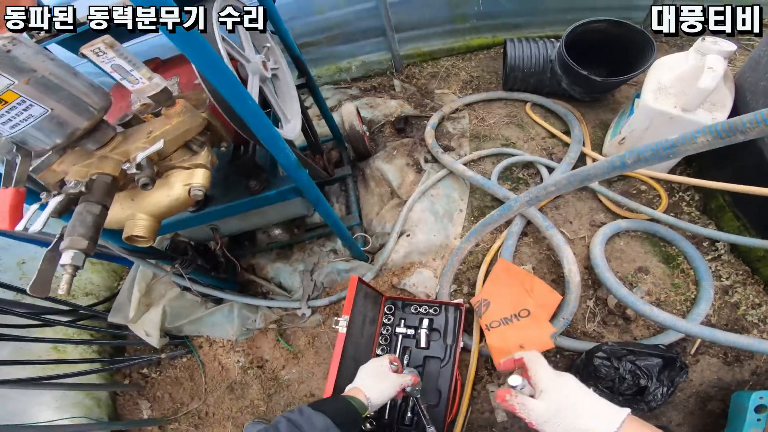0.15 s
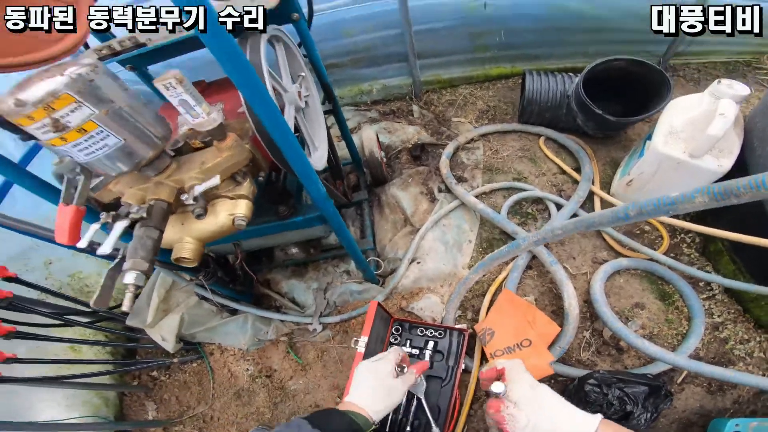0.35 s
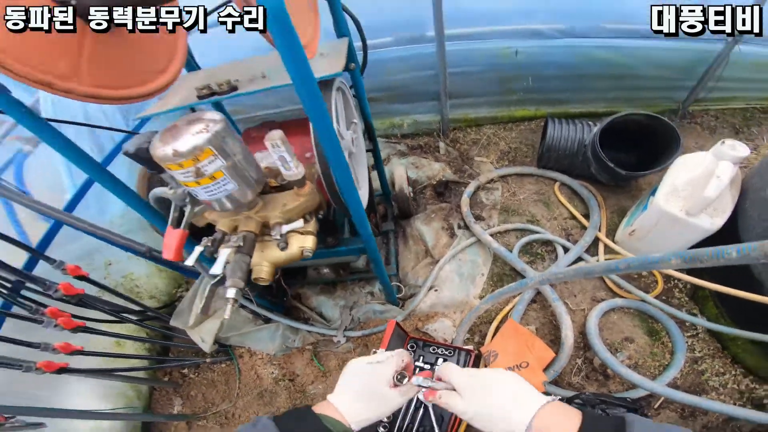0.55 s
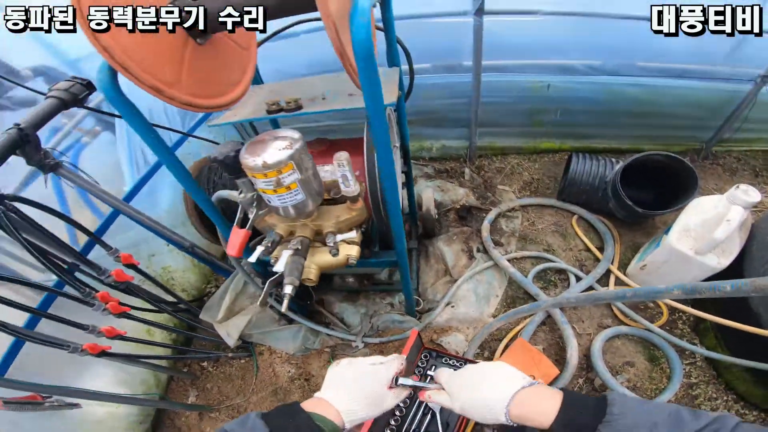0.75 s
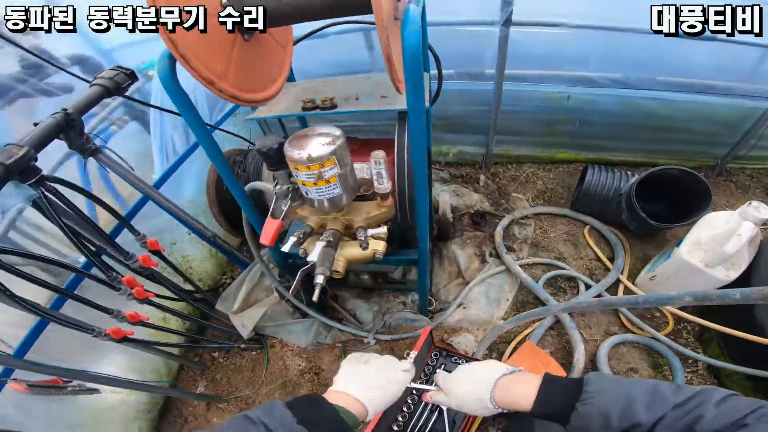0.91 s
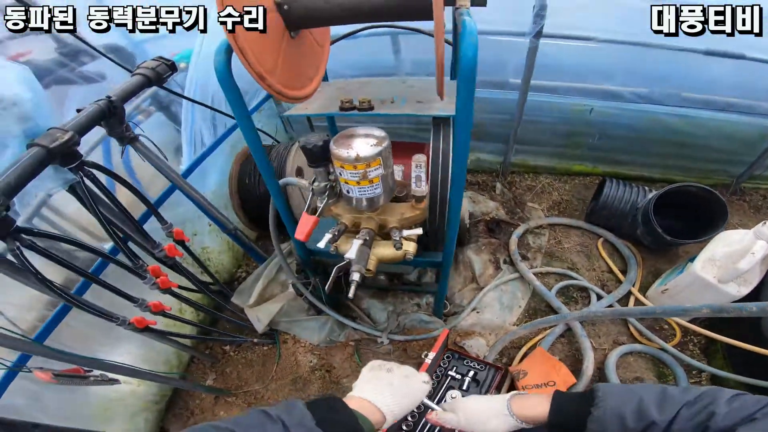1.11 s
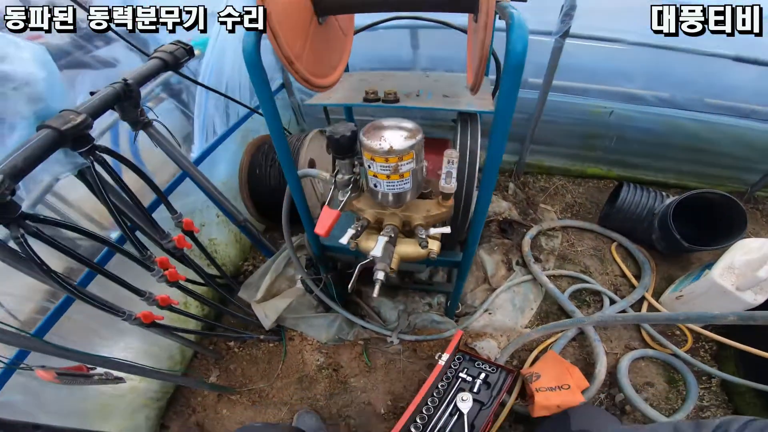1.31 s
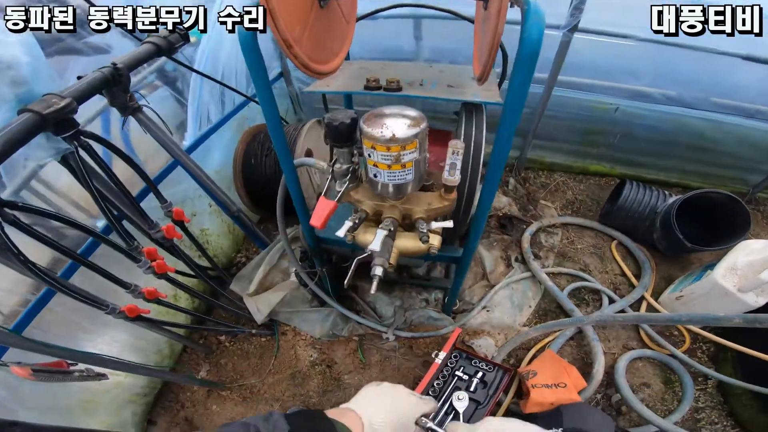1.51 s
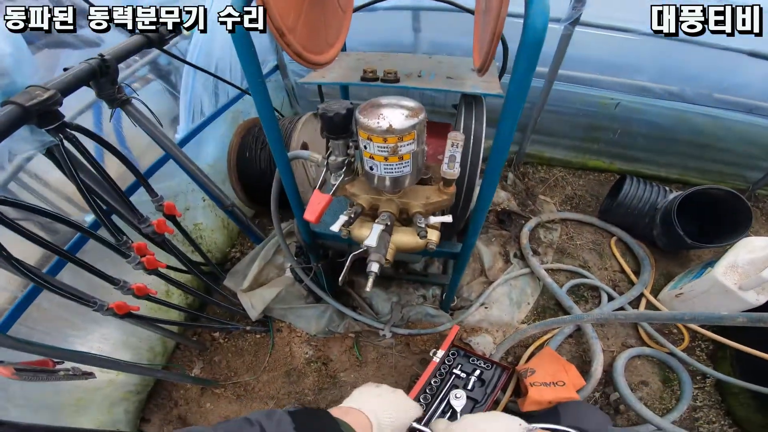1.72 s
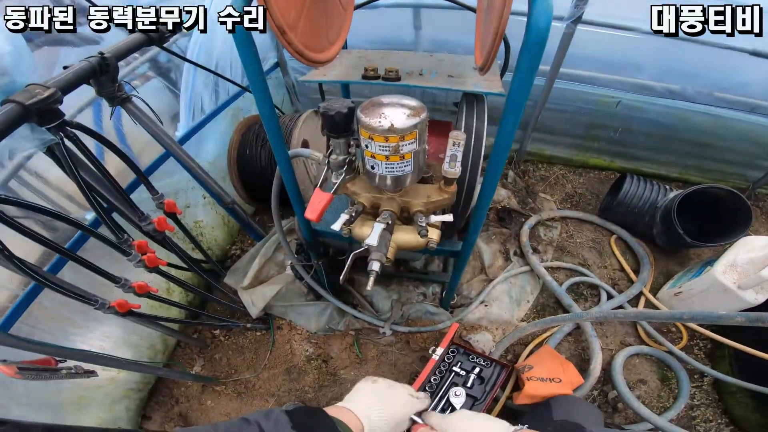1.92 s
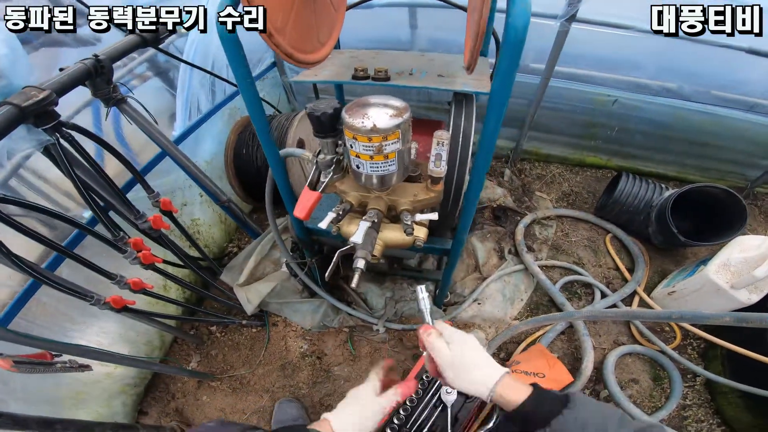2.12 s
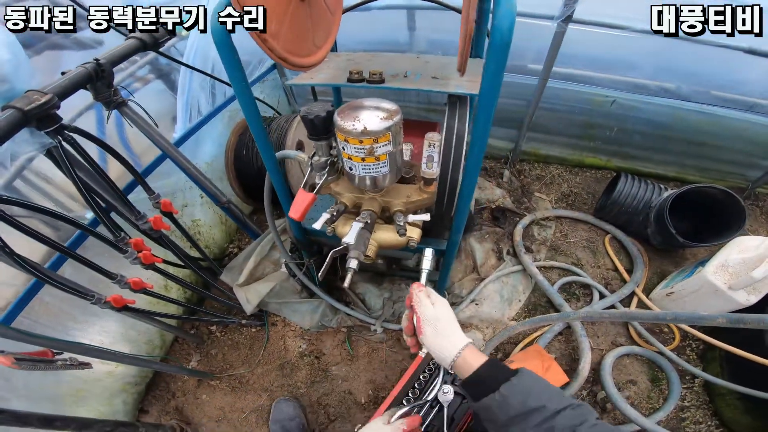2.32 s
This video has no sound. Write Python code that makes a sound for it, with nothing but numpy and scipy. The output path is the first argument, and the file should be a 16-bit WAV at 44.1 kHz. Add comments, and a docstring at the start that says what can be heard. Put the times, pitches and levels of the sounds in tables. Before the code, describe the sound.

Loud metal clatter of a wrench dropped on sockets, with a boomy case and high ring, then sparse gloved clinks, a short scrape, busier taps, a dull step and cloth brush, heard close in a greenhouse.

```python
"""Over faint air and low rumble, a ratchet wrench drops into a steel socket case in a plastic greenhouse.
The case crashes and settles: noise bursts for the rattling sockets, damped sines for the booming panels.
The wrench handle and one socket ring on as wavering sines. Then gloved hands clink the sockets (damped sines
and short noise), slide them (grainy noise) and nudge the case. Last, a shoe scuffs the dirt and a sleeve
swishes: shaped noise, with a rising buzz in the cloth. The microphone is close, a little left of the case."""
import sys
import numpy as np
from scipy import signal
from scipy.fft import rfft, irfft, next_fast_len
from scipy.io import wavfile
from scipy.ndimage import map_coordinates

SR = 44100
rng = np.random.default_rng(int(sys.argv[2]) if len(sys.argv) > 2 else 0)


def generate_wav(signal):
    """Clip the signal to [-1, 1] and save it as 16-bit WAV at the path in sys.argv[1]."""
    frames = np.transpose(np.atleast_2d(signal))
    scaled = np.clip(frames, -1, 1) * 32767
    pcm = np.round(scaled).astype(np.int16)
    wavfile.write(sys.argv[1], SR, pcm)


N = 103635  # length in samples
T = np.arange(N) / SR  # time through the scene, in seconds
HIT_T = np.arange(SR // 2) / SR  # time through one half-second blow, in seconds
WRENCH_LANDS_S = 0.321


def amp(db):
    """Turn decibels into a gain."""
    return 10 ** (np.asarray(db) / 20)


def unit(x):
    """Scale to an average strength (rms) of 1."""
    return x / np.sqrt(np.mean(x ** 2) + 1e-20)


def fade(t, t60):
    """Die away exponentially, by 60 dB in t60 seconds."""
    return np.exp(-np.log(1000) * t / np.maximum(t60, 1e-3))


def along(points, hz):
    """Read a curve of (Hz, value) points, with pitch on a log scale."""
    point_hz, value = np.transpose(points)
    return np.interp(np.log(hz + 1), np.log(point_hz + 1), value)


def wobble(rate):
    """A smooth random curve through `rate` random points a second."""
    points = rng.standard_normal(int(N * rate / SR) + 4)
    return map_coordinates(points, [T * rate])


def filtered(x, response):
    """Multiply the spectrum of x by a response that depends on frequency."""
    n = x.shape[-1]
    padded = next_fast_len(n + SR // 4)
    hz = np.fft.rfftfreq(padded, 1 / SR)
    return irfft(rfft(x, padded) * response(hz), padded)[..., :n]


def causal(x, points):
    """Colour a sound by (Hz, dB) points without smearing it ahead of its start."""
    def response(hz):
        # Folding the cepstrum forward gives the minimum-phase filter.
        cepstrum = irfft(np.log(amp(along(points, hz))))
        half = len(cepstrum) // 2
        cepstrum[1:half] *= 2
        cepstrum[half + 1:] = 0
        return np.exp(rfft(cepstrum))
    return filtered(x, response)


def add(out, start_s, x):
    """Mix x into out from start_s, cutting it off at the end of the scene."""
    part = out[:, round(start_s * SR):][:, :x.shape[-1]]
    part += x[..., :part.shape[1]]


# How alike scattered sound is at the two ears.
# Each row: frequency in Hz, likeness (1 is the same, 0 unrelated, below 0 opposed).
EAR_LIKENESS = [(200, 0.92), (450, .85), (1200, -0.15), (3000, 0.22), (8000, -0.5)]


def scattered(pair):
    """Mix two unrelated noises into a stereo field whose ears agree most in the bass."""
    def mid_and_side_gain(hz):
        angle = np.arccos(np.clip(along(EAR_LIKENESS, hz), -1, 1)) / 2
        return np.array([np.cos(angle), np.sin(angle)])
    mid, side = filtered(pair, mid_and_side_gain)
    return np.array([mid + side, mid - side])


def grains(shape, spread_db):
    """Tiny contacts of uneven size: noise whose strength jumps every half millisecond."""
    size = SR // 2000
    strength = amp(spread_db * rng.standard_normal(shape[-1] // size + 1))
    uneven = np.repeat(strength, size)[:shape[-1]]
    return unit(rng.standard_normal(shape) * uneven)


def rub(colour, spread_db):
    """Friction: grainy stereo noise, coloured, with an rms of 1."""
    noise = scattered(grains((2, N), spread_db))
    return unit(filtered(noise, lambda hz: amp(along(colour, hz))))


def strokes(rows):
    """Add up loudness shapes that each rise, hold and die away."""
    total = 0
    for start, attack, hold, release, db in rows:
        rise = np.clip((T - start) / max(attack, 1e-3), 0, 1)
        total = total + amp(db) * rise * fade(np.maximum(T - start - attack - hold, 0), release)
    return total


# How long the room's tail lasts.
# Each row: frequency in Hz, time to fall 60 dB in seconds.
ROOM_T60 = [(200, .3), (1500, 0.23), (5000, 0.23), (10000, 0.32)]


def greenhouse(x, pan_db):
    """Direct sound, quick echoes from lid and ground, and a short tail."""
    early_t60, early_db, tail_db = 0.06, -1.5, -8.5  # s, dB, dB
    n = len(HIT_T)
    early = scattered(rng.standard_normal((2, n)))
    early = early * fade(HIT_T, early_t60) * np.clip(HIT_T / 0.0031, 0, 1)
    # Each frequency band of the tail dies at its own pace.
    hz, t, bands = signal.stft(scattered(rng.standard_normal((2, n))), SR, nperseg=256)
    dying = bands * fade(t, along(ROOM_T60, hz)[:, None])
    tail = signal.istft(dying, SR, nperseg=256)[1][:, :n] * np.clip(HIT_T / 0.0088, 0, 1)
    answer = (amp(early_db) * unit(early) + amp(tail_db) * unit(tail)) / np.sqrt(n)
    answer[:, 0] += amp([pan_db / 2, -pan_db / 2])  # the direct sound
    return signal.fftconvolve(x[None], answer, axes=1)[:, :n]


def contact(t60, crack_t60, crack_db, spread_db):
    """A sharp first contact plus the dying chatter of small ones, both made of noise."""
    crack = unit(rng.standard_normal(len(HIT_T)) * fade(HIT_T, crack_t60))
    chatter = unit(grains(HIT_T.shape, spread_db) * fade(HIT_T, t60))
    return unit(amp(crack_db) * crack + chatter)


def ringing(modes, pitch=1, scatter=0):
    """Struck steel: a sum of dying sines, with levels and phases a little different each time."""
    total = 0
    for hz, db, t60 in modes:
        level = amp(db + rng.normal(0, 1.6)) * fade(HIT_T, t60)
        mode_hz = hz * pitch * (1 + scatter * rng.standard_normal())
        total = total + level * np.sin(2 * np.pi * (mode_hz * HIT_T + rng.random()))
    return unit(total)


# The five frequencies, in Hz, at which crashes and clinks list their colour.
BAND_HZ = (400, 1450, 3200, 6400, 9200)
# Blows on the case. Each row: start in seconds, rattle's 60 dB fade in seconds, relative level of the
# thump in dB, then five relative levels in dB, one at each of BAND_HZ.
CRASHES = [(.2015, 0.13, -50, -31, -30, -40, -50, -54.5), (.2112, 0.25, -20, -10, -4, -11.5, -22, -26),
           (.321, 0.18, -20, -10, -7.5, -13.5, -20, -34), (.3835, 0.17, -25, -17, -8.5, -19.5, -21, -32.5),
           (.4048, 0.18, -34, -16.5, -13.5, -22.5, -41.5, -51.5),
           (.424, 0.19, -32.5, -19, -11.5, -38.5, -31.5, -40),
           (.4443, 0.15, -39, -26, -19.5, -29.5, -32, -32.5),
           (.505, 0.32, -53, -44, -28.5, -36, -51, -43.5), (.5889, .3, -57, -42, -43, -46, -46, -46)]
# How the case's panels boom.
# Each row: frequency in Hz before scatter, relative level in dB, 60 dB fade in seconds.
CASE_PANELS = [(73, -7.5, .3), (93.5, -1.5, 0.44), (140, -2.5, 0.29), (173.5, 1, 0.27), (254, -5, 0.34),
               (319, 0.5, 0.4), (374.5, -3.5, 0.42), (613, -2, .3), (785, 2, 0.33), (1012, 0, 0.28),
               (1108, -1, 0.55)]
# How the case colours the rattle. Each row: frequency in Hz, gain in dB.
CASE_COLOUR = [(250, -0.5), (500, -2.5), (800, 0), (1250, 0), (1800, -3.5), (2500, -1), (3600, 0.5),
               (5000, -1.5), (7500, -1)]


def case(level_db=-11, thump_db=-14, crack_db=-3, settling_crack_db=-14, settling_rise_s=0.004):
    """Each blow rattles all the sockets and booms the panels; the settling bounces start more softly."""
    out = np.zeros((2, N))
    for start, t60, low_db, *bands in CRASHES:
        settling = start > WRENCH_LANDS_S + 0.03
        this_crack_db = settling_crack_db if settling else crack_db
        rise_s = settling_rise_s if settling else 1 / SR
        rattle = contact(t60, crack_t60=0.02, crack_db=this_crack_db, spread_db=4.5)
        rattle = rattle * np.clip(HIT_T / rise_s, 0, 1)
        bass = [(40, bands[0] - 18), (130, bands[0])]
        colour = bass + list(zip(BAND_HZ, bands)) + [(12000, bands[-1] - 5)]
        in_room = causal(greenhouse(rattle, pan_db=-3), colour)
        add(out, start, amp(level_db) * causal(in_room, CASE_COLOUR))
        boom = ringing(CASE_PANELS, scatter=0.0254) * np.clip(HIT_T / 0.0078, 0, 1)
        add(out, start, amp(low_db + thump_db) * boom)
    return out


def free_ring(curve, modes, pan_db, rock_rate, rock_phase, ear_phase):
    """Steel that rings on while it rocks, so that level and phase waver at each ear."""
    waver_db = 1.7
    curve_s, curve_db = np.transpose(curve)
    age = np.maximum(T - curve_s[0], 0)
    # Past the last point of the curve the level falls by 120 dB a second.
    level_db = np.interp(T, curve_s, curve_db) - 120 * np.maximum(T - curve_s[-1], 0)
    start = np.clip((T - WRENCH_LANDS_S) / 0.003, 0, 1)
    out = np.zeros((2, N))
    for hz, mode_db, fade_db in modes:
        level = amp(level_db + mode_db - fade_db * age) * start
        rocking = rock_phase * wobble(rock_rate) * fade(age, 1.9)
        shared = np.tanh(wobble(rock_rate))
        for ear, side in enumerate((1, -1)):  # left, right
            ear_shift = ear_phase * (side + wobble(rock_rate / 2) / 2)
            phase = 2 * np.pi * hz * T + rocking + ear_shift
            ear_waver_db = waver_db * (2 * shared + np.tanh(wobble(rock_rate)))
            out[ear] += level * amp(side * pan_db / 2 + ear_waver_db) * np.sin(phase)
    return out


# The handle's ring as the wrench bounces and settles. Each row: time in seconds, base level in dB.
HANDLE_LEVEL = [(0.31, -28), (0.326, -22), (0.342, -21), (0.364, -41), (0.394, -14), (0.464, -32),
                (0.49, -18.5), (0.508, -18.5), (0.552, -29.5), (0.636, -27), (0.664, -36), (0.948, -63),
                (0.96, -75)]
# The handle's tones. Each row: frequency in Hz, relative level in dB, extra fade in dB per second.
HANDLE_TONES = [(1245.7, 2.5, 1), (2505, -19.5, 17.5), (3400, -22.5, -2.5), (5880, -22, 11),
                (7630, -34, 21.5)]


def handle_ring():
    """The wrench handle rings like a bar, following the level of its bounces."""
    return free_ring(HANDLE_LEVEL, HANDLE_TONES, pan_db=-4.0, rock_rate=85, rock_phase=1.9, ear_phase=0.58)


# The ring of one freely ringing socket. Each row: time in seconds, base level in dB.
BELL_LEVEL = [(0.315, -49), (0.331, -23.5), (0.387, -25), (0.415, -36), (0.437, -29), (0.659, -60),
              (0.701, -57), (0.753, -71), (0.8, -72)]
# That socket's tones. Each row: frequency in Hz, relative level in dB, extra fade in dB per second.
BELL_TONES = [(6440, 3, 0), (10256, -8, -8), (13745, -5, 0), (14710, -8, 25)]


def bell_ring():
    """One socket rings freely, like a small high bell."""
    return free_ring(BELL_LEVEL, BELL_TONES, pan_db=-1, rock_rate=58.3, rock_phase=1.0, ear_phase=0.84)


# Sockets clinking. Each row: start in seconds, chatter's 60 dB fade in seconds, pitch ratio, level of the
# ring against the contact in dB, then five relative levels in dB, one at each of BAND_HZ.
CLINKS = [(0.6953, 0.026, 1, 4, -38, -44.5, -20, -31, -38),
          (0.7918, .03, 1.1, -11, -65, -67, -44.5, -46, -64),
          (0.8281, 0.024, 1, -9, -69, -42.5, -41, -43, -54),
          (0.96, 0.02, 0.85, -7, -73, -31.5, -53, -54, -59),
          (1.0038, 0.039, 1.0, 0.5, -43, -23.5, -28.5, -36, -38),
          (1.124, .04, 1.2, -10, -41, -48, -44, -73, -74),
          (1.4221, 0.099, 1, -8, -50, -38, -33.5, -47, -56),
          (1.4406, 0.056, 0.87, 4, -44, -41, -33, -42, -49),
          (1.4967, 0.07, 0.98, 0, -43, -35.5, -28.5, -33.5, -32),
          (1.5684, .03, 1, 0.5, -51, -39.5, -35.5, -42.5, -60),
          (1.6235, 0.024, 1.04, -0.5, -52, -31.5, -34.5, -30.5, -31.5),
          (1.697, 0.087, .98, -7.5, -40, -19.5, -26, -24.5, -27.5),
          (1.7583, 0.025, 0.66, -6, -43, -48, -48, -60, -42),
          (1.773, 0.011, 0.88, -1.5, -36, -32.5, -38.5, -42.5, -55.5),
          (1.8195, .04, .92, 12, -53, -28, -33, -28, -53),
          (1.825, 0.056, 0.97, -5.5, -28.5, -19.5, -21.5, -19, -18),
          (1.8334, 0.13, 1.03, -9, -41, -35.5, -22, -18, -23.5)]
# A socket's tones. Each row: frequency in Hz before the pitch ratio, relative level in dB,
# 60 dB fade in seconds before the tray's extra damping.
SOCKET_TONES = [(1473, -6.5, 0.035), (2855, 3, 0.051), (3020, 1.5, 0.11), (3527, -4, .09), (4300, -3, 0.11),
                (5200, -5, 0.13), (6010, 1, 0.2), (6480, 3.5, 0.084), (7150, 8, 0.14), (7220, -3.5, 0.21),
                (8500, -14, 0.23), (8990, 4, 0.26), (9240, -1, 0.11), (11540, 4, .15), (14400, 8, 0.097)]


def clinks(level_db=-15, neighbour_db=-3):
    """A socket taps a neighbour of slightly different size; the tray damps both."""
    tray_t60 = 0.17  # s
    out = np.zeros((2, N))
    for start, t60, pitch, ring_db, *bands in CLINKS:
        neighbour = ringing(SOCKET_TONES, pitch, scatter=0.04)
        pair = ringing(SOCKET_TONES, pitch) + amp(neighbour_db) * neighbour
        damped = unit(pair * fade(HIT_T, tray_t60))
        tap = contact(t60, crack_t60=0.0022, crack_db=-3, spread_db=5.5) + amp(ring_db) * damped
        colour = [(100, bands[0] - 6)] + list(zip(BAND_HZ, bands)) + [(12000, bands[-1] - 4)]
        add(out, start, amp(level_db) * causal(greenhouse(unit(tap), pan_db=-5.5), colour))
    return out


# Steel sliding in the tray; a row that starts after the end of the scene stays silent.
# Each row: start, attack, hold and 60 dB release in seconds, then level in dB.
SLIDES = [(1.247, 0.066, 0.026, 0.22, -35.5), (1.307, 0.0022, 0.04, .1, -33.5),
          (2.1, 0.029, 0.043, 0.14, -44.5), (2.9, .015, .015, .05, -30)]
# The colour of the sliding noise. Each row: frequency in Hz, relative level in dB.
SLIDE_COLOUR = [(100, -8.5), (300, -7), (600, -6), (1500, -9), (2600, -2), (3300, -13), (4200, -6.5),
                (8500, -8), (10000, -18), (15000, -13.5)]
# The nudge of the case. One row: start in seconds, frequency in Hz, level in dB, 60 dB fade in seconds.
BUMP = (1.477, 285, -26, .045)


def handling():
    """Sockets catch, slip and sing in the tray, and the case takes a soft nudge."""
    catch_db, sing_hz, sing_db = 3, 4096, -3.5
    sing_colour = [(sing_hz * 1.004, -50), (sing_hz, 0), (sing_hz * 1.05, -50)]
    sing = rub(sing_colour, spread_db=4.5)
    sliding = unit(amp(catch_db * wobble(240)) * rub(SLIDE_COLOUR, spread_db=2.5))
    out = strokes(SLIDES) * sliding
    out += strokes(SLIDES[1:2]) * amp(sing_db) * sing  # only the second slide sings
    start, hz, db, t60 = BUMP
    knock = causal(rng.standard_normal(len(HIT_T)), [(500, 5.5), (1800, 6), (4000, -12)])
    thud = np.sin(2 * np.pi * hz * HIT_T) + 0.28 * knock
    shape = fade(np.maximum(HIT_T - 0.006, 0), t60) * np.clip(HIT_T / 0.0029, 0, 1)
    add(out, start, amp(db) * thud * shape)
    return out


# The shoe landing, then the grit it grinds.
# Each row: start, attack, hold and 60 dB release in seconds, then level in dB.
STEP = [(2.028, 0.0059, 0.005, 0.36, -25.5)]
GRIT = [(1.97, 0.039, .1, 1, -43), (2.028, .004, 0.092, 0.24, -37.5)]
# The colours of the scuff and the grit. Each row: frequency in Hz, relative level in dB.
STEP_COLOUR = [(60, -19), (200, -11), (350, 0.5), (850, -4), (1500, -11), (3000, -14), (10000, -24)]
GRIT_COLOUR = [(200, -4.5), (1000, 1.5), (2600, -3), (4500, -12.5), (7000, -7.5), (10000, -11.5)]


def footstep():
    """A dull scuff on dirt with grit under the sole: two friction noises of uneven strength."""
    scuff = unit(amp(3 * wobble(130)) * rub(STEP_COLOUR, spread_db=2.5))
    grit = unit(amp(1.5 * wobble(160)) * rub(GRIT_COLOUR, spread_db=2.5))
    return strokes(STEP) * scuff + strokes(GRIT) * grit


# The sleeve's brushes. Each row: start, attack, hold and 60 dB release in seconds, then level in dB.
SWISH = [(2.17, .06, 0.049, 0.048, -32.5), (2.28, .02, .06, .1, -48)]
# The rising pitch of the weave. Each row: time in seconds, centre frequency in Hz.
SWISH_GLIDE = [(2.2, 1050), (2.245, 1400), (2.285, 1787)]
# The colour of the cloth noise. Each row: frequency in Hz, relative level in dB.
SWISH_COLOUR = [(150, -21.5), (700, -9.5), (1400, -9), (2700, -10), (4500, -18.5), (10000, -21.5),
                (15000, -17)]


def sleeve(wobble_rate=900, zip_db=-3):
    """Cloth brushes cloth; the weave zips higher as the arm speeds up."""
    centre_hz = np.interp(T, *np.transpose(SWISH_GLIDE))
    phase = 2 * np.pi * np.cumsum(centre_hz) / SR
    # Fast random wobbling spreads the gliding tone into a narrow band of noise.
    weave = unit(wobble(wobble_rate) * np.sin(phase) + wobble(wobble_rate) * np.cos(phase))
    return strokes(SWISH) * unit(rub(SWISH_COLOUR, spread_db=1.0) + amp(zip_db) * weave)


# The colours of the air and the rumble. Each row: frequency in Hz, relative level in dB.
AIR_COLOUR = [(15, -32.5), (25, -8.5), (85, -17.5), (1160, -12), (1280, -9), (1820, -16.5), (2400, -15),
              (2650, -16), (4060, -19), (10000, -27), (13000, -68), (22000, -120)]
RUMBLE_COLOUR = [(20, -6), (40, -1), (75, 0.5), (160, -2), (300, -6.5), (600, -16), (2000, -41)]
# How strong the handling rumble is. Each row: time in seconds, level in dB before rumble_db is added.
RUMBLE_LEVEL = [(0.0, -51.5), (0.17, -53.5), (0.29, -57), (0.75, -59.5), (0.96, -58), (1.23, -50.5),
                (1.69, -46), (1.82, -51), (2.35, -55.5)]


def background(air_db=-51, rumble_db=1):
    """Faint air and rustle, and the rumble of the moving microphone, as slowly wavering noise."""
    air = amp(air_db + 0.4 * wobble(10.98)) * rub(AIR_COLOUR, spread_db=1.5)
    level_db = rumble_db + np.interp(T, *np.transpose(RUMBLE_LEVEL)) + 1.0 * wobble(17.9)
    return air + amp(level_db) * rub(RUMBLE_COLOUR, spread_db=-0.5)


# Soft jolts of the microphone.
# Each row: start in seconds, length in seconds, frequency in Hz, level in dB.
JOLTS = [(0.036, .1, 70.6, -42.5), (1.003, .14, 77.5, -49), (1.487, 0.095, 72.9, -41.5),
         (1.81, .11, 35, -42)]


def jolts():
    """Brief low swells as the body moves: deep sines of unsteady phase."""
    total = 0
    for start, length, hz, db in JOLTS:
        swell = np.sin(np.pi * np.clip((T - start) / length, 0, 1)) ** 2
        total = total + amp(db) * swell * np.sin(2 * np.pi * hz * T + 0.69 * wobble(40.2))
    return total


# The left-right balance of everything near. Each row: frequency in Hz, left minus right in dB.
BALANCE = [(200, 0.5), (400, 0.3), (750, -5.5), (1290, -7), (2400, -2.5), (4400, -1), (9000, 0), (15000, 3)]


def scene():
    """Near sounds lean right in the middle frequencies; background and jolts skip that balance."""
    near = case() + handle_ring() + bell_ring() + clinks() + handling() + footstep() + sleeve()
    balanced = filtered(near, lambda hz: amp(np.outer([0.5, -0.5], along(BALANCE, hz))))
    return balanced + background() + jolts()


# The microphone's colour. Each row: frequency in Hz, gain in dB.
MIC_COLOUR = [(9900, 0), (10400, -5), (11200, -16), (13000, -19), (14800, -19), (15700, -33)]


def record(dry):
    """The microphone dulls the treble, peaks round off at full scale, and the very top is cut."""
    top_hz = 15750
    x = causal(dry, MIC_COLOUR)
    x = x / (1 + np.abs(x) ** 6) ** (1 / 6)
    return filtered(x, lambda hz: hz < top_hz)


dry = scene()
out = record(dry)
generate_wav(out)
```